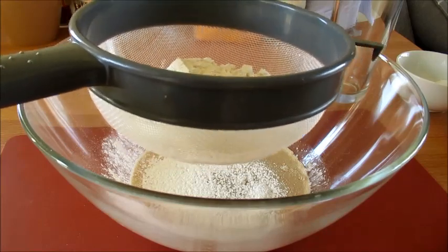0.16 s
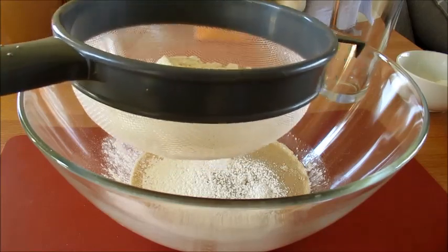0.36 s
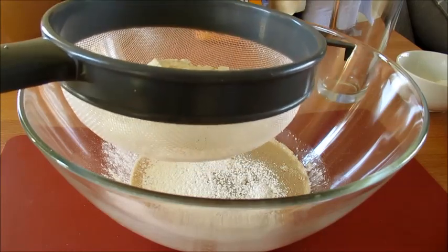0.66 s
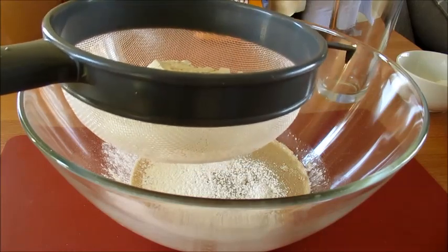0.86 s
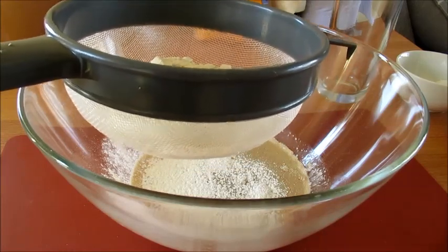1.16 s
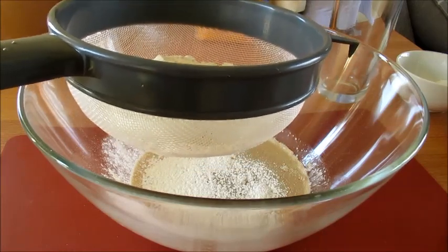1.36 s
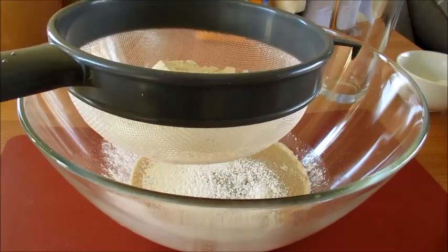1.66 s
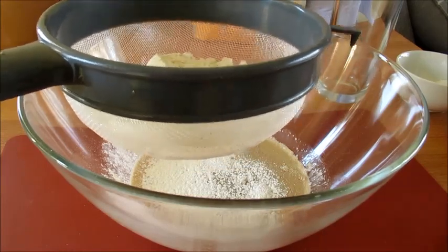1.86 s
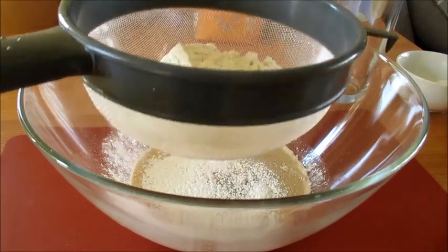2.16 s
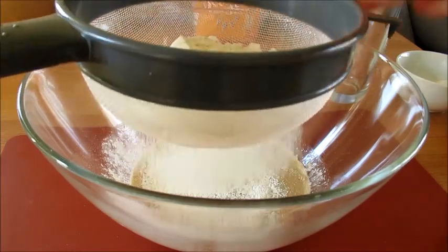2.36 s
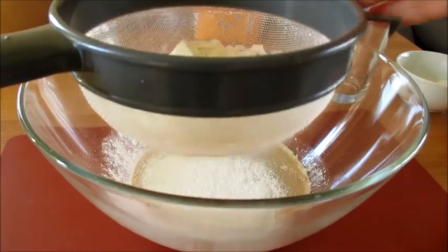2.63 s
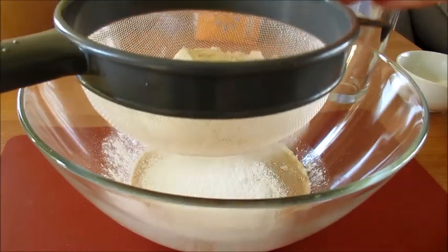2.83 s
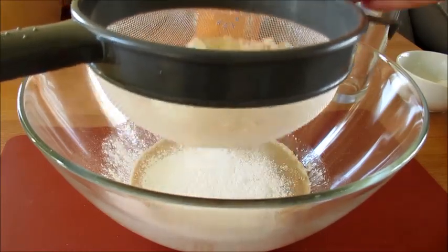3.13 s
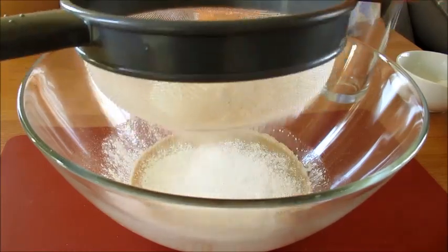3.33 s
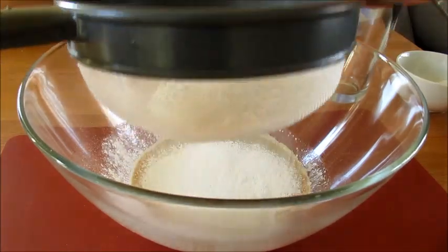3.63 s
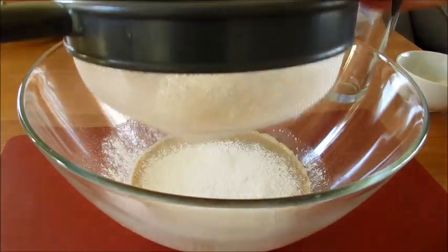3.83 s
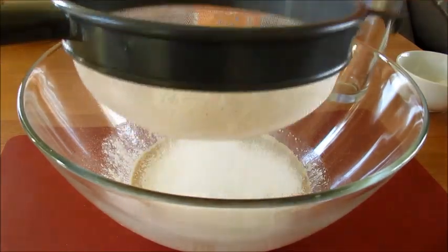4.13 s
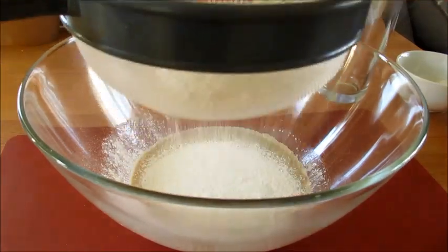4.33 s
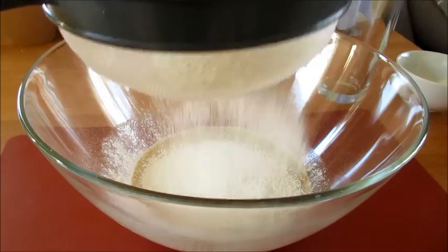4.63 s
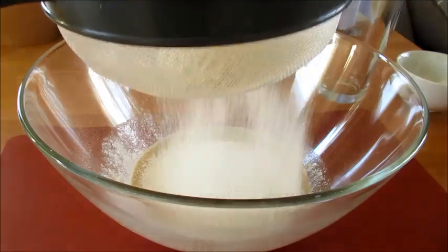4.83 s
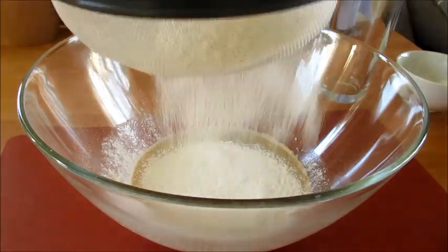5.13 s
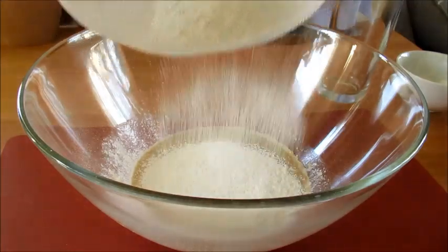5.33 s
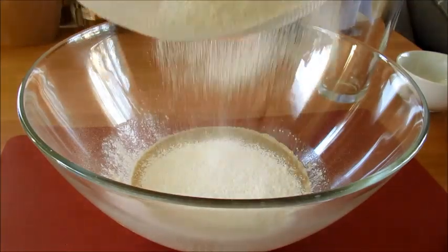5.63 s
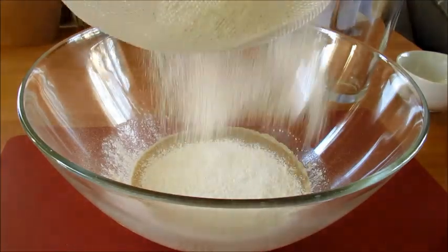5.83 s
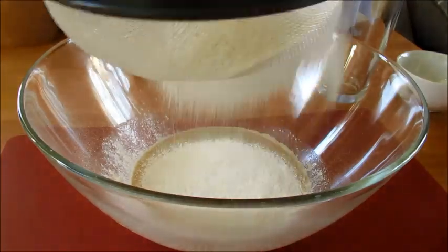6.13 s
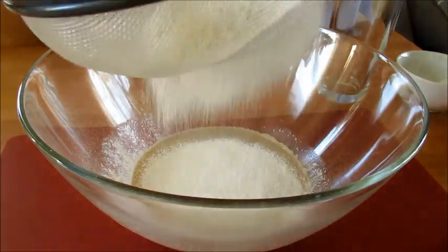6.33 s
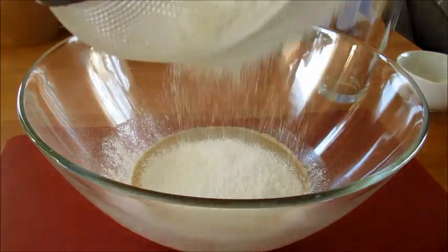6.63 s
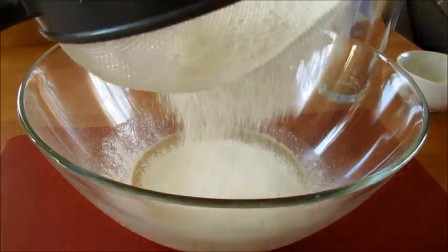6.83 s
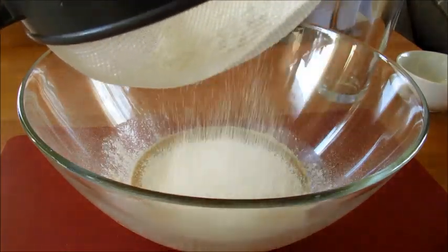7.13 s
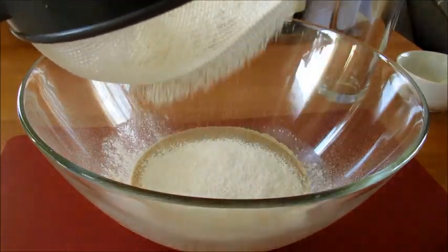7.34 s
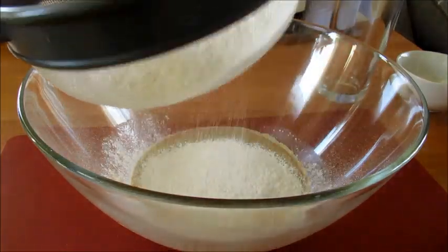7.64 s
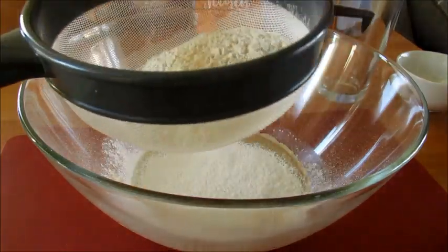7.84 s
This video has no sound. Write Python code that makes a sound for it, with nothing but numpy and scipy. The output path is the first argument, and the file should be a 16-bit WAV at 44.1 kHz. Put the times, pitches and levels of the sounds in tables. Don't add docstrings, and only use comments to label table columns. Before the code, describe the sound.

A quiet kitchen with soft room and microphone hiss, low rumble and a barely audible wall clock whir each second. From 0 to 0.6 s a drawer rolls on its runner with a low rattle, growing raspier, then a faint low hum wavers and falls in pitch until a hard latch snap at 1.2 s. At 1.4 s the wooden front bangs, the loudest event; contents slide and grind, panels groan, glass clinks, and a hollow thump at 1.7 s stops it, ringing briefly. From 2.4 s a hand taps a flour sieve close by, about six times a second: soft low push, crisp mesh hiss, then a small hollow knock as flour drops back. Around 6.5 to 7.0 s come stronger swishing brushes, a flat slap at 6.7 and metallic ticks; after that fainter brushes, with light taps at 7.7 and 7.9 s.

```python
import sys
import numpy as np
from scipy import signal
from scipy.fft import rfft, irfft, next_fast_len
from scipy.io import wavfile
from scipy.ndimage import uniform_filter1d

SR = 44100
rng = np.random.default_rng(int(sys.argv[2]) if len(sys.argv) > 2 else 0)


def store_wav(level_fs):
    pcm = np.round(np.clip(np.atleast_2d(level_fs), -1, 1) * 32767)
    wavfile.write(sys.argv[1], SR, pcm.T.astype(np.int16))


def gain_from_decibels(decibels):
    exponent = np.asarray(decibels, float) / 20
    return 10 ** exponent


N = 352359
TIME = np.arange(N) / SR


def rms_one(x):
    return x / np.sqrt(np.mean(x ** 2) + 1e-20)


def sine(hz, t):
    return np.sin(2 * np.pi * hz * t)


def in_time(rows, fade=.015):
    s, *columns = np.transpose(rows)
    gate = np.interp(TIME, [s[0] - fade, s[0], s[-1], s[-1] + fade], [0, 1, 1, 0])
    return [gate] + [np.interp(TIME, s, column) for column in columns]


def coloured(colour, size):
    hz = np.arange(size // 2 + 1) * SR / size + 1e-3
    points = np.array(colour)
    level_db = np.interp(np.log(hz), np.log(points[:, 0]), points[:, 1])
    return rfft(rng.standard_normal(size)) * gain_from_decibels(level_db), hz


def resonate(x, hz, width):
    r, w = np.exp(-np.pi * width / SR), 2 * np.pi * hz / SR
    return signal.lfilter([0, np.sin(w)], [1, -2 * r * np.cos(w), r * r], x + 1e-18)


def without_lows(x, hz):
    return signal.sosfilt(signal.butter(4, hz, "high", fs=SR, output="sos"), x)


def band(low_hz, high_hz, size):
    sos = signal.butter(2, [low_hz, min(high_hz, .45 * SR)], "band", fs=SR, output="sos")
    return rms_one(signal.sosfilt(sos, rng.standard_normal(size)))


def add(out, s, sound):
    i = round(s * SR)
    out[i:i + len(sound)] += sound[:N - i]


def burst(t, rise, t60):
    return (1 - np.exp(-t / rise)) * gain_from_decibels(-60 * t / t60)


def swell(t, peak_s, half_s):
    return np.exp(-((t - peak_s) / half_s) ** 2)


# (frequency [Hz], level [dB per Hz])
ROOM_COLOUR = [(8.8, -40), (15, -3), (33, -5.5), (54, -1), (137, -11), (188, -4), (346, -9), (568, -11),
               (638, -11), (930, -8.5), (1570, -12), (2980, -16.5), (3650, -20.5), (11000, -25),
               (15600, -26)]
# (time [s], level [dB])
STIR = [(0, -7), (.55, -4), (1.1, 3), (2, -9), (2.5, 6), (3.6, 3.5), (4.4, -1), (6, -10), (7, 4.5),
        (7.6, 4), (7.99, -4)]


def background():
    _, stir_db = in_time(STIR)
    size = next_fast_len(N)
    spectrum, _ = coloured(ROOM_COLOUR, size)
    steady = gain_from_decibels(-55.5) * rms_one(irfft(spectrum, size)[:N])
    rumble = gain_from_decibels(-68 + stir_db) * band(23, 230, N)
    drone = gain_from_decibels(-66 + 0.216 * stir_db) * band(190, 640, N)
    fine_hiss = gain_from_decibels(-62.5 + .1 * stir_db) * band(2500, 10100, N)
    return steady + rumble + drone + fine_hiss


def clock():
    out, t = np.zeros(N), TIME[:12000]
    for second in range(8):
        whir = band(10500, 11100, len(t)) * np.exp(-((t - .11) / 0.12) ** 6)
        add(out, .573 + second, gain_from_decibels(-70.5) * whir)
    return out


def groan(rows):
    out = np.zeros(N)
    for s, half, from_hz, to_hz, db in rows:
        t = TIME[:round(6 * half * SR)] - 3 * half
        hz = np.interp(t, [-half, half], [from_hz, to_hz])
        rough = rms_one(uniform_filter1d(rng.standard_normal(16384), size=900))[:len(t)]
        unsteady = np.pad(1 + .3 * rough, (0, len(t) - len(rough)))
        note = np.sin(2 * np.pi * np.cumsum(hz) / SR)
        add(out, s + t[0], gain_from_decibels(db) * swell(t, 0, half) * unsteady * note)
    return out


# (time [s], half length [s], start pitch [Hz], end pitch [Hz], level [dB])
BOARDS = [
    (.47, .025, 185, 180, -54),
    (2.5, .05, 270, 290, -58),
    (7.42, .06, 85, 90, -60),
    (7.82, .1, 88, 72, -58),
]


def settling_boards():
    return groan(BOARDS)


# (time [s], half length [s], start pitch [Hz], end pitch [Hz], level [dB])
GROANS = [(1.47, 0.036, 441, 443, -25.5), (1.575, 0.035, 455, 440, -29.5), (1.625, 0.02, 445, 455, -34),
          (1.641, 0.015, 650, 640, -23), (1.638, 0.022, 320, 355, -27), (1.69, 0.02, 445, 440, -29.5),
          (1.49, 0.025, 290, 265, -35), (1.744, 0.021, 290, 295, -29), (1.87, 0.06, 140, 150, -53),
          (1.727, 0.015, 146, 143, -27), (1.434, 0.0098, 283, 307, -21), (1.432, 0.01, 140, 150, -24.5),
          (1.412, 0.0032, 660, 880, -45), (1.945, 0.012, 530, 545, -45), (1.19, .015, 350, 340, -44),
          (1.265, .02, 330, 320, -49), (1.22, .02, 175, 170, -55), (1.385, .02, 150, 150, -52),
          (1.865, .02, 650, 660, -41), (1.235, 0.022, 790, 800, -44), (1.672, 0.016, 350, 364, -30),
          (1.49, .035, 700, 695, -31), (1.565, .04, 665, 645, -32), (1.62, .02, 805, 800, -38),
          (1.455, .02, 1055, 1050, -33), (1.6, .03, 290, 300, -39), (1.54, .03, 360, 350, -36),
          (1.5, .03, 905, 900, -37)]


def drawer_groans():
    return groan(GROANS)


def rattled(body, per_s):
    contacts = (rng.random(N) < per_s / SR) * rng.standard_normal(N) * 10.0
    contacts += rng.standard_normal(N)
    rings = sum(gain_from_decibels(db) * np.sqrt(width) * resonate(contacts, hz, width) for hz, width, db in body)
    return rms_one(without_lows(rings, 0.57 * body[0][0]))


# (frequency [Hz], width [Hz], level [dB])
RUNNER = [(138, 11, -18), (190, 14, -5), (262, 12, 0.5), (390, 35, -4.5), (690, 71, -18), (1140, 470, -9.5),
          (2300, 220, -14)]


def drawer_roll():
    end_s, fade_s = 0.576, .03
    rolling = np.clip((end_s - TIME) / fade_s + 1, 0, 1)
    rumble = gain_from_decibels(-53.5 - 5 * TIME) * rattled(RUNNER[:4], 220)
    rasp = gain_from_decibels(-65.5 + 12.5 * np.minimum(TIME, 1)) * rattled(RUNNER[4:], 300)
    return rolling * (rumble + rasp)


# (time [s], pitch [Hz], level [dB])
HUM = [
    (.6, 174.5, -59),
    (.856, 175.5, -51.5),
    (.96, 173.5, -57),
    (1.06, 165.8, -57),
    (1.17, 165, -62),
]


def damper_hum():
    gate, hz, hum_db = in_time(HUM, fade=0.023)
    return gate * np.sqrt(2) * gain_from_decibels(hum_db) * np.sin(2 * np.pi * np.cumsum(hz) / SR)


def blows(rows, body, tail, rise, soft):
    out, size = np.zeros(N), 32768
    t = TIME[:size]
    click = signal.lfilter([.4], [1, -.6], np.arange(size) == 0)
    rings = -sum(gain_from_decibels(db) * resonate(click, hz, width) for hz, width, db in body)
    rings = without_lows(rings * (1 - np.exp(-t / soft)), 0.71 * body[0][0])
    for s, ring_db, tail_db, t60, free in rows:
        seated = gain_from_decibels(-np.clip((t - free) / 0.0018, 0, 1) * 13.0)
        spectrum, hz = coloured(tail, size)
        spectrum = spectrum / np.std(irfft(spectrum))
        octave = np.round(2 * np.log2(hz / 1000)) / 2
        wash = np.zeros(size)
        for o in np.arange(-4.5, 4.5, .5):
            wash += irfft(spectrum * (octave == o)) * burst(t, rise, t60 * 2 ** (-.2 * o))
        add(out, s, gain_from_decibels(ring_db) * seated * rings / np.abs(rings).max())
        add(out, s + 0.00154, gain_from_decibels(tail_db) * wash)
    return out


def panel(s, modes):
    out, t = np.zeros(N), TIME[:32768]
    add(out, s, sum(gain_from_decibels(db) * burst(t, .004, t60) * sine(hz, t) for hz, db, t60 in modes))
    return out


# (time [s], ring level [dB], tail level [dB], tail t60 [s], free ringing [s])
LATCH = [
    (1.171, -12, -31.5, 0.53, 0.0093),
    (1.196, -22, -53, 0.284, 0.009),
    (1.2005, -35, -59, .2, 0.00496),
]
# (frequency [Hz], width [Hz], level [dB])
LATCH_BODY = [(798, 56, -2.5), (1238, 90, -5), (1560, 90, -14), (1870, 110, -4), (2320, 71, -9),
              (2834, 55, -7.5), (3080, 60, -11), (3310, 80, -8), (3723, 62, -20), (5130, 170, -13),
              (6000, 300, -12), (8190, 260, -5)]
# (frequency [Hz], level [dB per Hz])
LATCH_TAIL = [(88, -48), (150, -32), (208, -36), (300, -18), (416, -14), (459, -6), (525, -14), (800, -1),
              (1050, -14.5), (1870, -8.5), (4630, -21.5), (8100, -27), (15000, -38)]
# (frequency [Hz], level [dB], t60 [s])
LATCH_PANEL = [(458, -46, .6), (764, -37, .38), (807, -30.5, .33), (1244, -44, .3), (1873, -45, .45),
               (2019, -45, .28), (2875, -48, .3), (3149, -44, .17)]


def drawer_latch():
    snap = blows(LATCH, LATCH_BODY, LATCH_TAIL, 0.00085, soft=0.00016)
    return snap + panel(LATCH[0][0], LATCH_PANEL)


# (time [s], ring level [dB], tail level [dB], tail t60 [s], free ringing [s])
BUMP = [
    (1.4178, -.5, -18.5, 0.32, 0.0115),
    (1.43, -10, -44, .3, 0.017),
]
# (frequency [Hz], width [Hz], level [dB])
BUMP_BODY = [(144, 10, -18), (308, 50, -31), (458, 31, 2.5), (606, 17, 6), (903, 24, 1.5), (1355, 43, -8.5),
             (1730, 51, -6.5), (2070, 200, -0.5), (2650, 170, -8)]
# (frequency [Hz], level [dB per Hz])
BUMP_TAIL = [(35, -57), (60, -41), (126, -36), (372, -20), (428, -24), (503, -8), (648, 1.5), (1130, -7),
             (3660, -31.5), (3930, -29), (4730, -38), (6680, -38), (15000, -52)]


def drawer_bump():
    return blows(BUMP, BUMP_BODY, BUMP_TAIL, 0.0018, soft=0.00055)


# (time [s], force [dB])
SLIDE = [
    (1.44, -23),
    (1.494, -32),
    (1.548, -27),
    (1.622, -32),
    (1.634, -22.5),
    (1.688, -37),
    (1.7, -29.5),
]
# (frequency [Hz], width [Hz], level [dB])
WOOD = [(287.6, 7.5, -2.5), (348, 10.9, 0), (448, 20, 0), (590, 37, -1.5), (646, 17, 2), (698, 20, 0),
        (932, 25, -6)]


def sliding_contents():
    gate, force_db = in_time(SLIDE, fade=0.016)
    since = np.maximum(TIME - SLIDE[0][0], 0)
    boom = np.sqrt(2) * sine(146, TIME) + 0.12 * band(130, 165, N)
    boom *= gain_from_decibels(-37 + 0.56 * (force_db + 28.5) - 35 * since)
    rattle = gain_from_decibels(force_db - 6) * rattled(WOOD, 400)
    grit = gain_from_decibels(-47) * np.minimum(since / 0.08, 1) * band(880, 2540, N)
    scuff = gain_from_decibels(force_db - 9) * band(170, 950, N)
    return gate * (boom + rattle + grit + scuff)


# (time [s], ring level [dB], tail level [dB], tail t60 [s], free ringing [s])
STOP = [
    (1.7125, -9, -22, 0.33, 0.0176),
    (1.7155, -9, -35.5, 0.66, 0.0117),
    (1.935, -52, -45.5, 0.15, .03),
]
# (frequency [Hz], width [Hz], level [dB])
STOP_BODY = [(130.6, 100, -43), (447, 21, -6.5), (780, 110, 4), (930, 110, 4), (1520, 90, -19),
             (2480, 250, -31), (3160, 39, -25), (3400, 130, -24), (4080, 100, -31)]
# (frequency [Hz], level [dB per Hz])
STOP_TAIL = [(35, -51), (60, -45), (129, -2.5), (355, -8), (438, 3), (503, -10), (564, 4), (855, -0.5),
             (938, 4), (1630, -2), (1750, -2), (3420, -26.5), (15000, -67)]
# (frequency [Hz], level [dB], t60 [s])
STOP_PANEL = [(301, -30, .26), (441, -32, .35), (562, -31, .2), (765, -23.5, .22), (917, -31, .3),
              (969, -32, .35), (1067, -32, .3), (1165, -31, .33), (1249, -32, .33), (1435, -28, .2),
              (1545, -33, .3), (1949, -34, .23), (2164, -40, .35), (2315, -47, .3)]


def drawer_stop():
    thump = blows(STOP, STOP_BODY, STOP_TAIL, 0.00051, soft=0.00052)
    return thump + panel(STOP[0][0], STOP_PANEL)


# (time [s], small glass level [dB], large dish level [dB], tick level [dB])
CLINKS = [(1.423, -50, -45, -58), (1.429, -41, -54, -60), (1.453, -70, -55, -53), (1.470, -58, -47, -58),
          (1.519, -61, -63, -43), (1.565, -63, -54, -50), (1.603, -60, -53, -37), (1.621, -66, -70, -50),
          (1.712, -58, -35, -38), (1.78, -72, -46, -48), (1.938, -74, -77, -47)]
# (frequency [Hz], level [dB], t60 [s])
GLASS = [(3830, 5, 0.089), (5560, -5.5, 0.093), (6480, 3.5, 0.056), (6620, 3.5, 0.08), (8900, 2, .07),
         (10200, -22, 0.63)]
# (frequency [Hz], level [dB], t60 [s])
DISH = [(1712, 3, 0.66), (1980, -8, 0.22), (2190, -9, 0.2), (3140, -4.5, 0.14)]


def glassware():
    out, t = np.zeros(N), TIME[:16384]
    damped_s = 1.95
    for s, glass_db, dish_db, tick_db in CLINKS:
        free = np.clip((damped_s - s - t) / 0.044, 0, 1)
        for db, modes in ((glass_db, GLASS), (dish_db, DISH)):
            chances_db = rng.normal(0, 2.5, len(modes))
            for (hz, mode_db, t60), chance_db in zip(modes, chances_db):
                note = burst(t, 0.00096, t60) * sine(hz, t)
                add(out, s, gain_from_decibels(db + mode_db + chance_db) * note * free)
        add(out, s, gain_from_decibels(tick_db) * band(1800, 4900, len(t)) * burst(t, 0.00027, 0.028))
        add(out, s, gain_from_decibels(tick_db - 6.5) * band(8000, 15000, len(t)) * burst(t, 0.0005, .018))
    return out


# (time [s], level [dB], pitch [Hz], t60 [s])
PINGS = [(.573, -54, 9000, .015), (.682, -50, 2590, .044), (1.392, -45.5, 2380, 0.093),
         (1.566, -44, 14000, 0.022), (2.395, -44, 6600, 0.05), (2.533, -46, 6950, .022),
         (2.87, -41, 5400, 0.021), (3.034, -40.5, 210, 0.087), (3.257, -48, 580, .036),
         (3.95, -47, 1075, 0.057), (6.504, -35, 2670, 0.026), (6.507, -31, 5500, .03),
         (7.367, -41, 7500, 0.033), (1.172, -36, 6300, 0.038), (6.851, -38.5, 2000, .03),
         (2.705, -44, 8200, .02), (2.705, -43, 12000, .02), (7.011, -26, 5920, 0.03),
         (7.013, -33, 3700, .025), (6.505, -35, 4000, .025), (6.838, -41, 3650, .02), (6.7, -48, 5600, .03),
         (1.603, -44, 5900, .04), (1.31, -50, 4100, .03), (1.52, -46, 2200, .04), (7.012, -39, 1970, 0.034),
         (7.55, -47, 1380, .04), (1.617, -47, 10100, 0.036)]


def pings():
    out, t = np.zeros(N), TIME[:16384]
    for s, db, hz, t60 in PINGS:
        note = sine(hz, t) + .6 * band(0.92 * hz, 1.08 * hz, len(t))
        add(out, s, gain_from_decibels(db) * burst(t, 0.00077, t60) * note)
    return out


# (time [s], knock level [dB], knock pitch [Hz], extra thud [dB], hiss level [dB])
REBOUNDS = [(2.564, -52, 476, .3, -54), (2.731, -43.5, 530, -3, -54), (2.899, -49, 550, 7, -53),
            (3.068, -45, 500, .3, -54), (3.236, -30.5, 590, -2, -55), (3.408, -44.5, 597, -9, -55),
            (3.571, -41.5, 596, .3, -54), (3.739, -43, 610, .3, -55), (3.918, -39, 577, -3, -55),
            (4.089, -40, 606, -2, -51), (4.433, -37, 455, .3, -54), (4.602, -51, 447, 3, -54),
            (4.788, -37.5, 547, 3, -54), (4.957, -43, 500, .3, -55), (5.128, -43, 520, 3, -54),
            (5.308, -74, 463, .3, -54), (5.482, -41.5, 556, .3, -54), (5.651, -58, 482, .3, -51),
            (5.83, -48, 522, 7, -54), (6.002, -48.5, 570, 9, -54), (6.179, -41, 530, .3, -52),
            (6.356, -46.5, 530, .3, -54), (6.554, -57, 778, .3, -57), (6.697, -52, 447, .3, -51),
            (6.869, -62, 606, .3, -55), (7.049, -59, 744, .3, -55), (7.224, -51, 434, .3, -55),
            (7.398, -54, 795, .3, -54), (7.76, -59, 646, .3, -55)]


def flour_landing():
    out, t = np.zeros(N), TIME[:8192]
    for s, knock_db, hz, extra_db, hiss_db in REBOUNDS:
        thud_db = extra_db - 47 + .7 * (knock_db + 44.5) - 9 * np.log2(hz / 520)
        note = -sine(hz, t) * swell(t, .003, 0.0034)
        thud = -sine(295, t) * swell(t, .005, 0.0051)
        rattle = band(340, 750, len(t)) * burst(t, 0.0071, 0.091)
        hiss = band(2100, 12800, len(t)) * swell(t, .009, 0.0093)
        add(out, s, gain_from_decibels(knock_db) * (note + 0.4 * rattle) + gain_from_decibels(thud_db) * thud + gain_from_decibels(hiss_db) * hiss)
    return out


# (frequency [Hz], level [dB per Hz])
MESH = [(900, -17), (1500, -11.5), (2700, -13), (3400, -3), (4500, -2.5), (5800, -2), (7000, -5),
        (9000, -6.5), (12000, -8), (15500, -8.5)]
# (time [s], mesh hiss peak [dB], push level [dB], push pitch [Hz])
TAPS = [(2.3751, -39, -50.5, 87), (2.5246, -40.5, -48.5, 87), (2.7031, -29, -44, 75.4),
        (2.8701, -31, -43, 76), (3.0345, -38, -47, 74), (3.1899, -33.5, -46, 79.4),
        (3.3757, -35.5, -49.5, 80.5), (3.5388, -39.5, -47, 82), (3.8756, -37.5, -49, 83.4),
        (4.0438, -36, -48, 82), (4.3869, -38.5, -52.5, 75.6), (4.5687, -37, -51, 77),
        (4.747, -32, -50, 60.6), (4.9262, -36.5, -54.5, 61.5), (5.093, -38.5, -51, 76.5),
        (5.2735, -36, -58, 67), (5.4423, -31, -54.5, 64.6), (5.6292, -36, -54.5, 77.4),
        (5.7852, -35.5, -50, 78.1), (5.9707, -37.5, -51, 74.5), (6.134, -32.5, -45.5, 83),
        (6.3113, -33, -52, 64.6), (6.836, -31.5, -51.5, 71.5), (7.7195, -38, -62, 56.5),
        (7.9083, -40.5, -65, 56.5)]


def taps(rows, rise, t60, knock_hz, rim_db):
    out, t = np.zeros(N), TIME[:8192]
    for s, hiss_db, push_db, push_hz in rows:
        harder_db = hiss_db + 35
        knock_db = rim_db + 0.87 * (push_db + 50) + 0.22 * harder_db
        top_db = 0.5 - 0.55 * (s - TAPS[0][0]) - 0.24 * harder_db

        turns = t + 0.0056 * (1 - np.exp(-t / 0.0016))
        push = -sine(push_hz, turns) * burst(t, 0.0012, 0.052)
        push += 0.15 * sine(42, t) * burst(t, .004, 0.11)
        push += 0.12 * sine(205, t) * burst(t, 0.0015, 0.029)
        knock = band(knock_hz, 3.57 * knock_hz, len(t)) * burst(t, rise, 0.93 * t60)

        spectrum, hz = coloured(MESH, len(t))
        patches_db = np.interp(hz, np.arange(24) * 700, rng.normal(0, 2.0, 24))
        spectrum = spectrum * gain_from_decibels(patches_db)
        top = gain_from_decibels(np.interp(hz, [8000, 10000], [0, top_db]))
        hiss = irfft(spectrum * top) / np.std(irfft(spectrum))
        grain = gain_from_decibels(1.04 * rms_one(uniform_filter1d(rng.standard_normal(len(t)), size=40)))
        jolt = (t / rise) * np.exp(1 - t / rise) + 0.48 * burst(t, rise, t60)
        trickle = 0.1 * burst(t, 0.0051, 0.42)
        add(out, s, gain_from_decibels(knock_db) * knock + gain_from_decibels(hiss_db - 9) * hiss * (jolt * grain + trickle))
        add(out, s + 0.0023, gain_from_decibels(push_db + 18) * push)
    return out


# (time [s], mesh hiss peak [dB], push level [dB], push pitch [Hz])
BRUSHES = [
    (3.7024, -38.5, -56, 70.4),
    (4.23, -37, -61, 61.9),
    (6.5018, -25.5, -58.5, 67.3),
    (7.0049, -23, -56, 45.8),
    (7.1854, -35, -60.5, 43.1),
    (7.3646, -39.5, -58, 63.6),
    (7.5344, -35, -53.5, 75.4),
    (7.551, -37.5, -64, 70),
]
# (time [s], mesh hiss peak [dB], push level [dB], push pitch [Hz])
SLAP = [
    (6.6674, -25, -45.5, 68),
]
# (frequency [Hz], width [Hz], level [dB])
SLAP_BODY = [(1450, 250, -4), (1900, 200, -.5), (3310, 400, 4), (4200, 300, 1.5), (4930, 260, -3),
             (6200, 400, -3), (8360, 300, -6), (11200, 400, -10)]


def sieve():
    out = taps(TAPS, 0.0012, 0.06, 206, rim_db=-49.5)
    out += taps(BRUSHES, 0.0039, 0.067, 810, rim_db=-40)
    out += taps(SLAP, 0.0005, 0.019, 250, rim_db=-39)
    click = np.arange(8192) == 0
    ring = np.zeros(8192)
    for k, (hz, width, db) in enumerate(SLAP_BODY):
        ring += (-1) ** k * gain_from_decibels(db) * resonate(click, hz, width)
    add(out, SLAP[0][0], gain_from_decibels(-27) * ring)
    return out + flour_landing()


def scene():
    room = background() + clock() + settling_boards()
    drawer = drawer_roll() + damper_hum() + drawer_latch() + drawer_bump()
    drawer += sliding_contents() + drawer_stop() + drawer_groans()
    return (room + drawer + glassware() + pings() + sieve())[None]


def band_limit(x):
    return signal.sosfilt(signal.butter(12, 16130, fs=SR, output="sos"), x)


def record(dry):
    rounded = 1.1 * np.tanh(dry / 1.1)
    top_cut = signal.cheby2(16, 50, 15220, fs=SR, output="sos")
    return band_limit(signal.sosfilt(top_cut, rounded))


dry = scene()
out = record(dry)
store_wav(out)
```